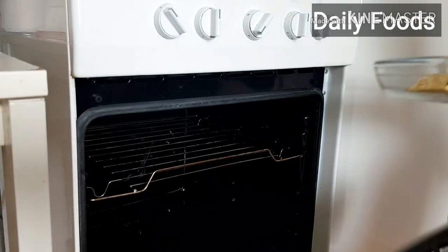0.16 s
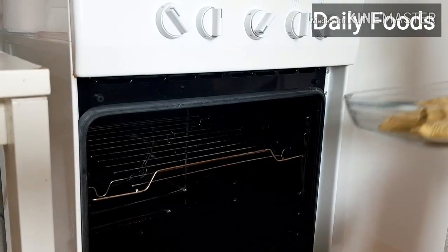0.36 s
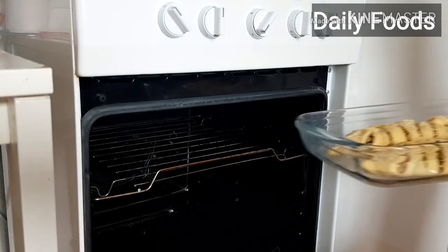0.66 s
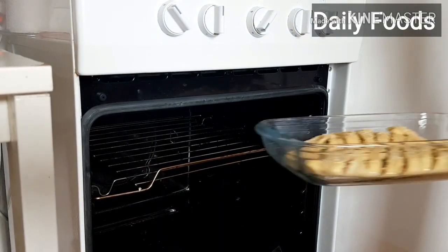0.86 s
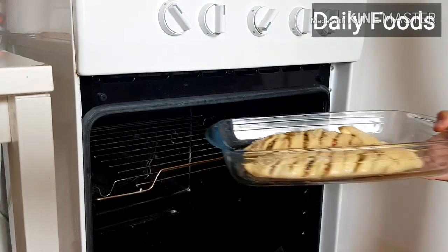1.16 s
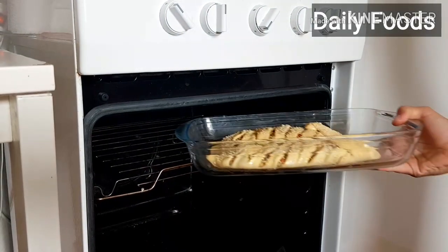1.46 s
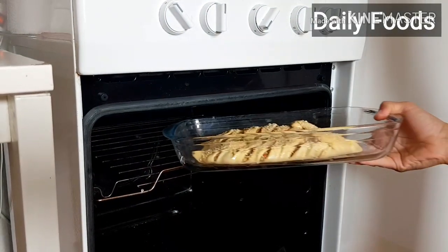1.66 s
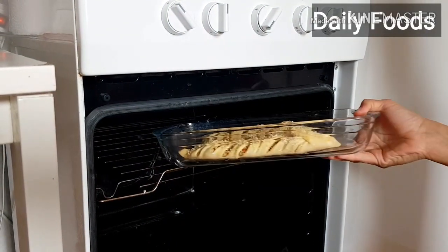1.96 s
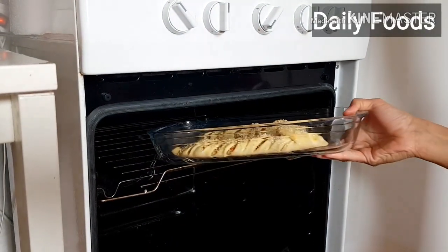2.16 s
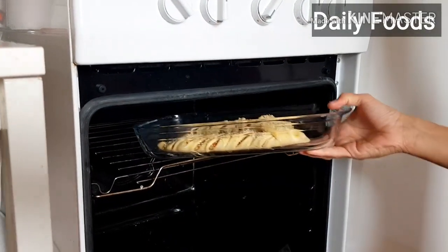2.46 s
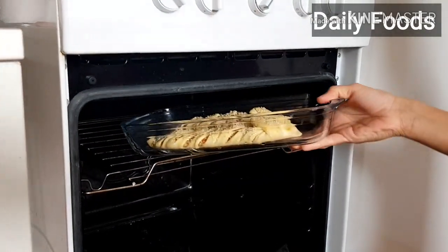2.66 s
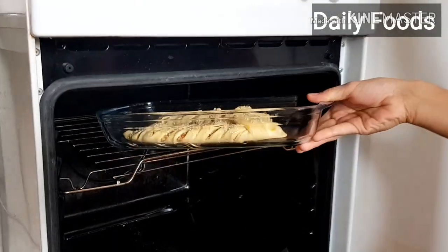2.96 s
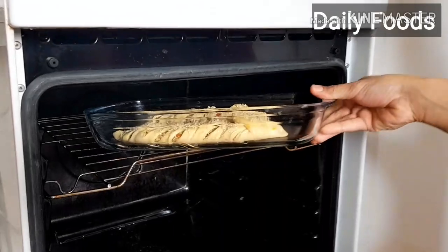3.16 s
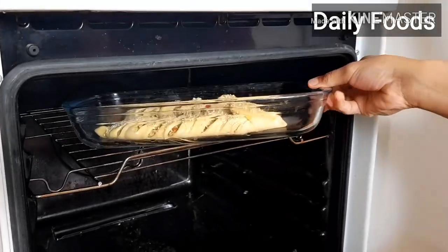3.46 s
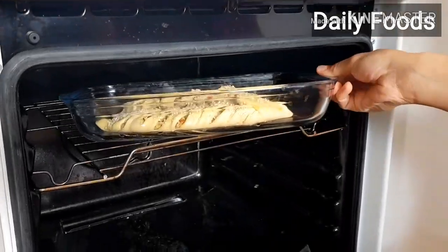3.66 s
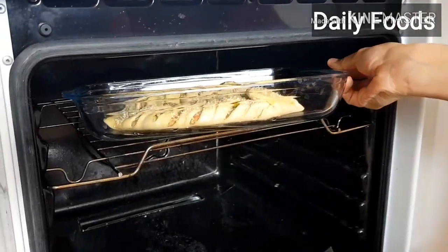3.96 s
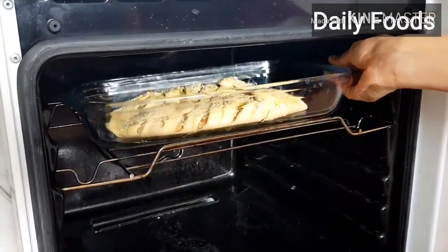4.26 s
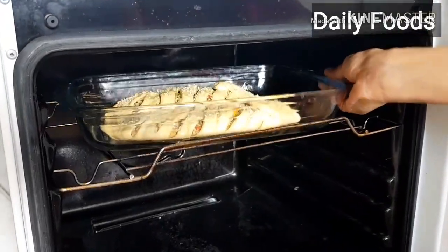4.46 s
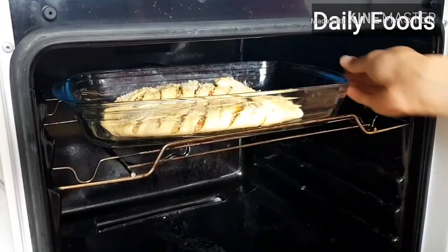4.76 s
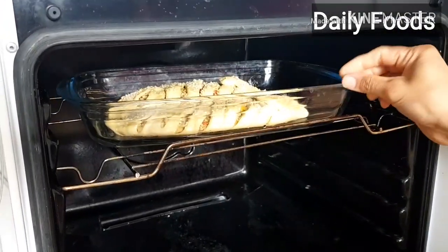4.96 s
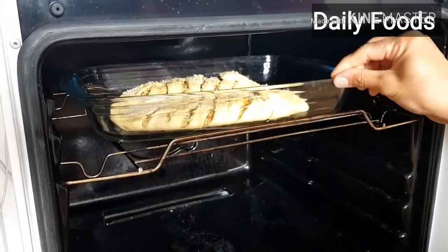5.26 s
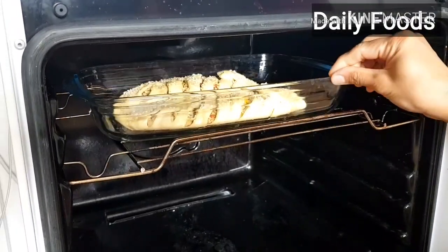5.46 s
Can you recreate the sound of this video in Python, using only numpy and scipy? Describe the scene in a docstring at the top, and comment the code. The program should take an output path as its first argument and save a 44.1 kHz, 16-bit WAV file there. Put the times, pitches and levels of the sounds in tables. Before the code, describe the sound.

A faint metallic hum from an opened oven door fades in the first half second, over low room rumble and steady microphone hiss in a small kitchen. From about 1.4 to 1.8 seconds a glass baking dish clinks lightly on a wire rack, with short scrapes. From 2 seconds it slides inward with a gritty rub, bumping bars at 2.3 and 2.55 seconds while the wires sing faintly. A louder cluster of ringing knocks and hollow thumps comes around 2.9 to 3.1 seconds, booming in the steel oven. Soft scraping continues, with one small clink near 3.6. At about 4.4 seconds the dish is let down with a clatter, the heaviest thump landing at 4.5. The rack rings and the oven walls drone softly as the dish rocks with light taps and scrapes until 5 seconds. A last faint scrape and tap follow near 5.4.

```python
"""In a small kitchen, a glass baking dish is set on a wire oven rack, bumped over its bars,
pushed in and let down with a clatter. Each knock rings the glass and the wires, booms in the
steel oven box and dies away in the room. Between knocks the dish scrapes and makes the wires
sing; at last it rocks to rest. Under it all lie a low room rumble and microphone hiss."""
import sys
import numpy as np
from scipy.fft import rfft, irfft, next_fast_len
from scipy.io import wavfile
from scipy.ndimage import map_coordinates

SR = 44100
rng = np.random.default_rng(int(sys.argv[2]) if len(sys.argv) > 2 else 0)


def dump(signal):
    """Clip the signal to [-1, 1] and save it as 16-bit WAV at the path in sys.argv[1]."""
    limited = np.clip(np.atleast_2d(signal).T, -1, 1)
    pcm = np.round(limited * 32767).astype(np.int16)
    wavfile.write(sys.argv[1], SR, pcm)


N = 247753
T = np.arange(SR) / SR  # one second of ringing

# Tone colours. Each row: frequency in Hz, relative level in dB.
RUMBLE_COLOUR = [(22, -19), (36, -1), (50, -0.5), (70, 6), (110, -3), (150, -7.5), (260, -12), (380, -21),
                 (500, -24.5), (900, -26.5), (2000, -33)]
HISS_COLOUR = [(410, -43), (700, -5), (862, -10.5), (1160, -4), (1320, -19), (1690, -10), (1850, -10),
               (2200, -6), (2850, -4), (3890, -6), (4430, 1.5), (5310, -2.5), (9040, -5), (11900, 1),
               (15600, -6.5)]
SCRAPE_COLOUR = [(35, -31), (85, 12.5), (140, 14.5), (220, 9), (340, 4), (490, 5.5), (650, 1), (950, -5.5),
                 (1150, 6), (1350, -3), (2400, -3), (4000, -11), (9000, -15), (15000, -15)]
OVEN_COLOUR = [(35, -40), (60, 1), (93, -14), (142, -29), (215, 0.5), (305, -7.5), (470, -6.5), (657, -10),
               (1320, -10.5), (1830, -14.5), (3190, -16), (4900, -13), (5600, -17.5), (6400, -18),
               (8090, -22.5), (10900, -15.5), (15500, -15)]
TAP_ECHO_COLOUR = [(200, 12), (1400, -7), (1800, 5), (2500, 1), (3200, -14), (12000, -24)]
KNOCK_COLOUR = [(700, -4.5), (2100, 3), (4500, 2), (9400, -4)]
RUB_COLOUR = [(30, -30), (90, 7.0), (2600, -15.0), (6000, -38)]
# How alike the two ears are. Each row: frequency in Hz, likeness (1 is the same, 0 unrelated).
ROOM_LIKENESS = [(130, 0.99), (300, 0.96), (640, 0.61), (1400, 0.078), (8000, 0.018)]
HISS_LIKENESS = [(60, 0.89), (180, 0.68), (550, -0.034), (1650, -0.075), (4970, -0.07), (15000, -0.063)]
RUMBLE_LIKENESS = [(50, 1.0), (300, 0.65)]
# Which way the knocks lean. Each row: frequency in Hz, left minus right in dB.
KNOCK_BALANCE = [(60, 4.5), (150, -1.5), (380, 0), (950, 3.5), (2380, 1), (5980, -3), (15000, 2.5)]

# Resonances of the steel. Each row: pitch in Hz, width in Hz, relative level in dB.
DOOR_TONES = [(72, 107, -7.5), (309, 14, -15), (432, 19, -5.5), (1590, 86, -12)]
WALL_TONES = [(134.5, 3.4, 3.5), (216, 19, -10.5)]
WIRE_TONES = [(990, 45, -7), (1150, 60, -5), (2290, 70, -4), (2370, 55, 0)]
# Modes, the tones a struck thing rings with. Each row: pitch in Hz, relative level in dB,
# ring time in seconds (the time to fade by 60 dB, called t60).
DISH_MODES = [(588, 1, .3), (702, 0, .24), (800, -2, .1), (963, -4, .15), (1789, -3, .16), (2360, -1, .1),
              (2954, -3, .15), (4222, -7, .22), (4450, -6, .08), (4780, -4, .08), (4935, -2.5, .22),
              (5067, -3.5, .27), (9000, -4, .07), (9798, -7, .13), (12350, -6, .1)]
TAP_MODES = [(240, -4, .1), (410, -9, .1), (570, -7, .06), (820, -12, .15), (1070, -6, .04),
             (1700, -1, .045), (1850, 0, .04), (2080, -4, .04), (2400, -1, .03)]
RACK_MODES = [(100.7, -7, 0.36), (212, -1.5, 0.52), (235, 1.5, 0.033), (278.6, -11, 0.99),
              (409, -6.5, 0.31), (486, 1.5, 0.19), (521.6, -5, 0.17), (1123, -19.5, 1), (1859, 2.5, 0.1)]
LOADED_RACK_MODES = [(817, -4, 1.2), (826, -7, .9), (1079, -7, 1), (1314, -8, 1.1), (1690, -7, .9),
                     (1897, -5, .9)]
BAR_MODES = {"front": [(1080, 0, .2), (1162, -2.5, 0.37), (1438, -10, 0.65), (2600, -9, 0.23),
             (2810, -3, 0.2), (2870, -7, 0.33), (3560, -6, 0.39), (4900, -12, 0.22), (4970, -4, 0.061),
             (6150, -1, .12), (6260, -0.5, 0.25), (6460, -5, .1), (9728, -9, .15), (10140, -8, 0.081),
             (11800, -2, .15)], "second": [(760, -24, 0.36), (1053, 2, 0.3), (1450, -6, 0.21),
             (2476, -4, 0.32), (2950, -3, 0.28), (3680, -16.5, 0.43), (5120, 9.5, 0.056), (5780, 2.5, .15),
             (6300, 2.5, 0.18), (10070, 3.5, 0.13), (11700, -5, 0.055), (12650, 3, 0.071), (13300, 1, .05)],
             "third, grazed": [(1800, -3, 0.055), (1930, -1, 0.066), (2050, 0, 0.21), (2190, 0, .06)],
             "third": [(1093, 7, 0.052), (1195, 10.5, 0.029), (1190, -10.5, 0.41), (1520, -6, 0.1),
             (1670, -17, 0.48), (2390, -15, 0.26)], "fourth, grazed": [(2190, 4.5, 0.25), (2290, -1, 0.66)],
             "fourth": [(1086, 10, 0.033), (1170, 10.5, 0.043), (1210, -10.5, 0.33), (1747, -13, 0.37),
             (2154, -10, 0.44), (2390, -15, .15)], "back": [(101, -3, .6), (414.5, -22, 0.51),
             (746, 3, 0.21), (848, 5.5, 0.078), (2283, 8, 0.059), (2560, -4, .12), (3040, -4, 0.15),
             (3780, 3.5, 0.064), (4710, 4.5, 0.057)], "resting": [(1425, -4.5, .25), (1563, -4.5, 0.16),
             (1990, 4, 0.068), (2140, -1, 0.18), (2290, -6, 0.18), (2460, 5, .08), (3413, -7, 0.15),
             (5780, 1.5, 0.056), (7100, -2.5, 0.078), (9530, -4, 0.06), (10100, -6, 0.1),
             (10910, 1.5, 0.12), (12900, 0, 0.083), (13700, -2, 0.087), (14500, -7, .07)]}  # one list for each bar and way of hitting it
# The rack's bounce. Each row: pitch in Hz, relative level in dB, ring time and build-up in seconds.
BOUNCE_MODES = [(213, 3.5, .095, .006), (238, -6, .14, .01), (390, -9, .09, .002), (475, -10, .09, .002),
                (510, -13, .12, .003), (610, -8, .07, .001)]
# The bands of a knock's clang. Each row: low and high edge in Hz, build-up in seconds,
# ring times of oven and kitchen in seconds, kitchen level against the oven in dB.
CLANG_BANDS = [(69, 353, 0.021, 0.023, 0.66, -3), (470, 1190, 0.01, 0.21, 0.49, -1),
               (1580, 2630, 0.0059, 0.19, 0.42, -2.5), (3040, 6070, 0.0022, 0.14, 0.31, -5.5),
               (7650, 10700, 0.0016, 0.21, 1, -46)]

# Swells of sound. Each row: time of the peak in seconds, level in dB, rise and fall in dB per second.
HANDLING_SWELLS = [(0, -53.5, 100, 52), (1.85, -50.5, 29, 29), (3.08, -53, 7, 20), (5.29, -48.5, 79, 30)]
DOOR_SWELL = (0, -48, 100, 62)  # a single row
# The dish slides on the bars. Each row: start, length and rise in seconds, base level in dB.
DISH_SLIDES = [(1.449, 0.051, .014, -44.5), (1.707, 0.17, .014, -45), (2.055, 2.24, 0.042, -55),
               (2.297, 0.46, 0.015, -49.5), (2.968, 0.034, 0.019, -35), (4.381, 0.045, 0.045, -42),
               (4.495, 0.22, .014, -40), (4.824, 0.17, .03, -47), (5.293, 0.087, 0.097, -47.5)]
# The held or rocking dish taps the bars. Each row: start in seconds, peak level in dB.
LIGHT_TAPS = [(1.138, -52), (2.979, -21), (4.601, -29), (4.769, -25), (4.919, -28.5), (4.997, -29),
              (5.383, -41)]
# The dish's weight drops on the rack. Each row: start in seconds, peak level of the thump in dB.
DISH_DROPS = [(2.288, -31), (2.979, -33), (3.024, -25), (3.082, -29), (4.487, -15), (4.545, -28),
              (4.769, -34)]
# Glass knocks on wire. Each row: start in seconds, strength in dB, brightness in dB per octave,
# extra bass in dB, extra dish ring in dB, extra bar ring in dB, name of the bar.
DISH_KNOCKS = [(1.43, -42.5, 2.5, -7, -30, -0.5, "front"), (1.544, -47.5, -2, 1, -30, 3, "front"),
               (1.701, -38.5, 2, -24, -29, -3, "second"), (1.758, -34, -18, -19, -17, -14, "second"),
               (1.803, -41, -30, -13, -18, -8, "second"), (2.250, -35, -7.5, -35, -36, -2, "third, grazed"),
               (2.285, -28, -13.5, -2, -35, 4.5, "third"), (2.540, -37, -1, -31, -7, -3, "fourth, grazed"),
               (2.558, -29.5, -5, -1.5, -31, 0, "fourth"), (2.887, -25.5, 2, -5.5, -2.5, -3.5, "back"),
               (2.894, -40, -18, 0, -14, 3, "back"), (2.977, -24.5, -6, -3, -25, -10.5, "back"),
               (3.023, -27, -2.5, -0.5, -24, -8, "back"), (3.564, -45.5, 2.5, -10, -26, -8.5, "second"),
               (4.430, -26.5, -2, -6.5, -19, -11, "resting"), (4.486, -38, 1.5, 7.5, -25, -19, "resting"),
               (4.502, -28.5, -4, -6, -26, -17, "resting"), (4.531, -29, -2, -7, -14, -5.5, "resting"),
               (4.539, -30.5, 4.5, 0.5, -33, -1, "resting"), (4.599, -30, -5, -7.5, -25, -11, "resting"),
               (4.619, -43.5, 3.5, -9, -20, -4, "resting"), (4.655, -44, 0, 7, -11, -1, "resting"),
               (4.817, -49, 4.5, 1, -7, -6, "second"), (4.834, -41.5, 1, 1, -8, -15, "second")]


def amp(db):
    """Turn decibels into a gain."""
    return 10 ** (np.asarray(db) / 20)


def unit(x):
    """Scale x to an average (rms) level of 1."""
    return x / np.sqrt(np.mean(x ** 2) + 1e-20)


def along(points, hz):
    """Read between (Hz, value) points on a log frequency axis."""
    freqs, values = np.transpose(points)
    return np.interp(np.log(hz + 1), np.log(freqs + 1), values)


def wobble(rate):
    """A smooth curve through `rate` random points a second."""
    return map_coordinates(rng.standard_normal(int(N * rate / SR) + 4), [np.arange(N) * rate / SR])


def stroke(start, length_s, rise_s, fall_db_per_s):
    """A gain that rises from the start and dies away once its length is over."""
    t = np.arange(N) / SR - start
    return np.clip(t / rise_s, 0, 1) * amp(-fall_db_per_s * np.maximum(t - length_s, 0))


def swell(peak_s, db, rise_db_per_s, fall_db_per_s):
    """A gain that grows to a peak and fades again."""
    t = np.arange(N) / SR - peak_s
    return amp(db - np.abs(t) * np.where(t < 0, rise_db_per_s, fall_db_per_s))


def add(track, start, sound):
    """Mix a sound into a track at a start time in seconds."""
    part = track[:, round(start * SR):][:, :sound.shape[1]]
    part += sound[:, :part.shape[1]]


def filtered(x, response):
    """Scale each frequency in x by response(hz)."""
    n = x.shape[-1]
    padded = next_fast_len(n + 8192)
    return irfft(rfft(x, padded) * response(np.fft.rfftfreq(padded, 1 / SR)), padded)[..., :n]


def rolloff(ratio):
    """A filter gain that falls steeply once a frequency ratio passes 1."""
    return 1 / np.sqrt(1 + ratio ** 10)


def noise(colour, likeness, size=N):
    """Stereo noise of level 1 with a given colour and likeness between the ears."""
    def response(hz):
        turn = np.arccos(np.clip(along(likeness, hz), -1, 1)) / 2
        return amp(along(colour, hz)) * [np.cos(turn), np.sin(turn)]
    mid, side = filtered(rng.standard_normal((2, size)), response)
    return unit(np.array([mid + side, mid - side]))


def crowded_modes(x, depth_db, width_hz):
    """Many close modes give x random peaks and valleys in tone, weaker towards the bass."""
    def gain(hz):
        hills = map_coordinates(rng.standard_normal(int(SR / width_hz)), [hz / width_hz])
        return unit(amp(depth_db * np.tanh(hz / width_hz / 20) * np.clip(hills, -2, 1.5)))
    return filtered(x, gain)


def rubbed(tones):
    """A random force keeps resonances sounding, at level 1."""
    def response(hz):
        return sum(amp(db) * 1j * hz * width / (pitch ** 2 - hz ** 2 + 1j * hz * width)
                   for pitch, width, db in tones)
    return unit(filtered(noise(RUB_COLOUR, ROOM_LIKENESS), response))


def ringing(modes, band_db, scatter_db):
    """One stereo ring per hit: each mode is struck as hard as its band and has a phase for each ear."""
    hz, db, t60 = np.transpose(modes)
    band = np.searchsorted([high for _, high, *_ in CLANG_BANDS[:-1]], hz)
    chance = rng.standard_normal((len(band_db), 2, len(hz)))
    ear_shift = np.arccos(np.clip(along(ROOM_LIKENESS, hz), -1, 1)) * np.sign(chance[:, 0]) / 2
    phase = rng.uniform(0, 2 * np.pi, ear_shift.shape)[:, None] + np.stack([ear_shift, -ear_shift], 1)
    strike = amp(band_db[:, None, band] + db + scatter_db * chance[:, 1:]) * np.exp(1j * phase)
    blur_hz = .002 * hz[:, None]  # shifting contact makes every mode waver
    step_times = np.arange(200) / 200
    drifts = np.cumsum(rng.standard_normal((len(hz), len(step_times))), axis=1)
    drifts *= np.sqrt(2 * np.pi * blur_hz * step_times[1])
    angle = 2 * np.pi * hz[:, None] * T + [np.interp(T, step_times, drift) for drift in drifts]
    fade = amp(-60 * T / t60[:, None]) * (1 - np.exp(-T / .0015))
    return (strike @ (fade * np.exp(1j * angle))).real


def background(rumble_db=-59.5, hiss_db=-54.5):
    """A low room rumble swells as the microphone is moved, under a steady hiss."""
    level = np.sqrt(amp(rumble_db) ** 2 + sum(swell(*move) ** 2 for move in HANDLING_SWELLS))
    rumble = level * noise(RUMBLE_COLOUR, RUMBLE_LIKENESS)
    return rumble + amp(hiss_db) * noise(HISS_COLOUR, HISS_LIKENESS)


def oven_drone(below_drop_db=25):
    """The opened door comes to rest; later the steel walls drone after each drop."""
    drones = [amp(db - below_drop_db) * stroke(start, 0, rise_s=0.27, fall_db_per_s=18.5)
              for start, db in DISH_DROPS]
    wall_level = np.linalg.norm(drones, axis=0)
    return swell(*DOOR_SWELL) * rubbed(DOOR_TONES) + wall_level * rubbed(WALL_TONES)


def singing_wires(start=1.95, push_s=.72, level_db=-51, sink_per_s=0.1):
    """The rubbed wires sing ever louder, sinking in pitch as the dish travels, then ring out."""
    remaining_s = np.maximum(start + push_s - np.arange(N) / SR, 0)
    pitch_ratio = 1 + sink_per_s * remaining_s
    position = np.cumsum(pitch_ratio) % (N - 1)
    song = np.array([map_coordinates(ear, [position]) for ear in rubbed(WIRE_TONES)])
    song = unit(song * amp(3 * wobble(98)))  # the glass catches as it goes
    return amp(level_db) * stroke(start, push_s, rise_s=push_s, fall_db_per_s=45) * song


def scrape():
    """Glass catches and slips on the wires: a gritty rub, coloured by the oven box."""
    grit = noise(SCRAPE_COLOUR, ROOM_LIKENESS)
    slide = np.max([amp(db) * stroke(start, length, rise, fall_db_per_s=73)
                    for start, length, rise, db in DISH_SLIDES], axis=0)
    slide_db = 20 * np.log10(slide + 1e-9)
    pressure = np.clip((slide_db + 60) / 15, .2, 1)  # a light touch glides, a heavy one catches
    catching = amp(pressure * (2.5 * wobble(170) + wobble(30)))
    return slide * catching * crowded_modes(grit, depth_db=5.5, width_hz=20)


def rocking(echo_db=-12, echo_t60=0.24):
    """The held or rocking dish makes light, damped taps, and the oven answers faintly."""
    taps = ringing(TAP_MODES, np.zeros((len(LIGHT_TAPS), len(CLANG_BANDS))), scatter_db=5.0)
    echo_fade = amp(echo_db - 60 * T / echo_t60)
    out = np.zeros((2, N))
    for (start, db), tap in zip(LIGHT_TAPS, taps):
        echo = echo_fade * noise(TAP_ECHO_COLOUR, ROOM_LIKENESS, size=SR)
        add(out, start, amp(db) * (tap / np.abs(tap).max() + echo))
    return out


def rack_ring(strength_db=-41):
    """The heaviest drop leaves the rack ringing while the dish rocks to rest."""
    start, _ = max(DISH_DROPS, key=lambda drop: drop[1])
    band_db = np.full((1, len(CLANG_BANDS)), strength_db)
    out = np.zeros((2, N))
    add(out, start, ringing(LOADED_RACK_MODES, band_db, scatter_db=4.5)[0])
    return out


def thumps():
    """The loaded rack gives way and springs back: a short hollow thump, the same in both ears."""
    bounce = sum(amp(db - 60 * T / t60) * (1 - np.exp(-T / rise)) * np.sin(2 * np.pi * hz * T)
                 for hz, db, t60, rise in BOUNCE_MODES)
    out = np.zeros((2, N))
    for start, db in DISH_DROPS:
        add(out, start, amp(db) * bounce[None] / np.abs(bounce).max())
    return out


def oven_clangs(band_db):
    """One dense clang per knock: each band builds up, then dies away in the oven box and kitchen."""
    wash = crowded_modes(noise(OVEN_COLOUR, ROOM_LIKENESS), depth_db=3.5, width_hz=24)
    offsets = rng.integers(0, N - SR, len(band_db))  # each spot struck has its own echoes
    clangs = np.zeros((len(band_db), 2, SR))
    for (low, high, rise, oven_t60, room_t60, room_db), levels in zip(CLANG_BANDS, band_db.T):
        band = unit(filtered(wash, lambda hz: rolloff(low / (hz + 1)) * rolloff(hz / high)))
        build_up = 1 - np.exp(-T / rise)
        fade = np.hypot(amp(-60 * T / oven_t60), amp(room_db - 60 * T / room_t60))
        for clang, offset, db in zip(clangs, offsets, levels):
            clang += amp(db - 3.5) * build_up * fade * band[:, offset:offset + SR]
    return clangs


def knock_levels(strength_db, brightness, bass_db, treble_from_hz=1600):
    """Each knock's dB in each band: a harder touch lifts the treble, a heavier one the lowest band."""
    centres = np.sqrt([low * high for low, high, *_ in CLANG_BANDS])
    octaves = np.maximum(np.log2(centres / treble_from_hz), 0)
    upper_db = along(KNOCK_COLOUR, centres) + np.outer(brightness, octaves)
    return strength_db[:, None] + np.where(centres == centres.min(), bass_db[:, None], upper_db)


def knocks(let_go_s=4.4):
    """Glass hits wire: dish, rack and bar ring clearly, and the oven box clangs."""
    times, strength_db, brightness, bass_db, dish_db, bar_db, bars = map(np.array, zip(*DISH_KNOCKS))
    band_db = knock_levels(strength_db, brightness, bass_db)
    rack_db = np.where(times < let_go_s, -11.5, -2.5)  # the rack rings more once it carries the dish
    rings = ringing(DISH_MODES, band_db + dish_db[:, None], scatter_db=0.5)
    rings += ringing(RACK_MODES, band_db + rack_db[:, None], scatter_db=0.5)
    for ring, bar, levels in zip(rings, bars, band_db + bar_db[:, None]):
        ring += ringing(BAR_MODES[bar], levels[None], scatter_db=0.5)[0]
    out = np.zeros((2, N))
    for start, ring, clang in zip(times, rings, oven_clangs(band_db)):
        clang = crowded_modes(clang, depth_db=4.0, width_hz=180)  # each spot favours its own tones
        add(out, start, ring + clang)
    ear_share = np.array([[.5], [-.5]])
    return filtered(out, lambda hz: amp(along(KNOCK_BALANCE, hz) * ear_share))


def scene():
    """The dish, the rack and the oven in the kitchen."""
    hits = knocks() + thumps() + rack_ring() + rocking()
    return hits + scrape() + singing_wires() + oven_drone() + background()


def record(dry, bass_hz=42, top_hz=15700):
    """The microphone loses the deepest bass and keeps nothing above its top frequency."""
    return filtered(dry, lambda hz: (hz < top_hz) * rolloff(bass_hz / (hz + 1)))


dry = scene()
out = record(dry)
dump(out)
```